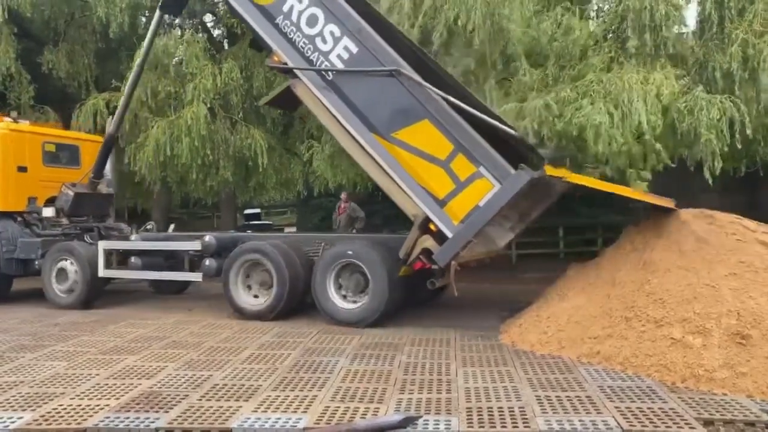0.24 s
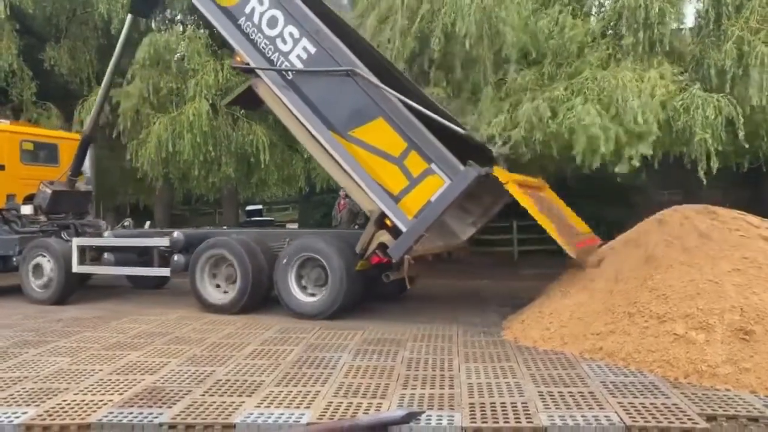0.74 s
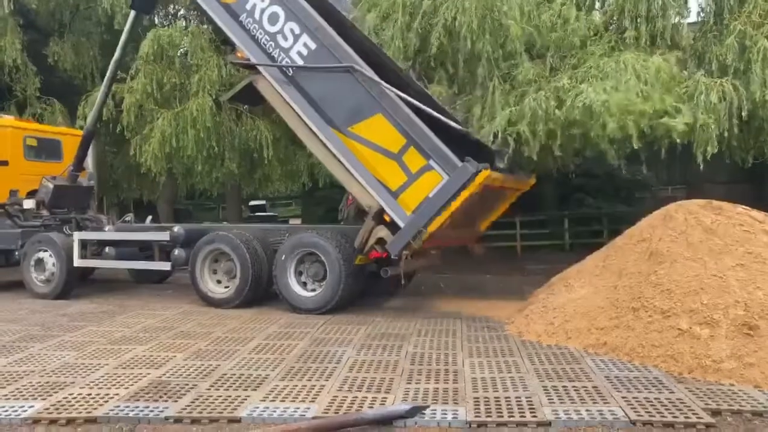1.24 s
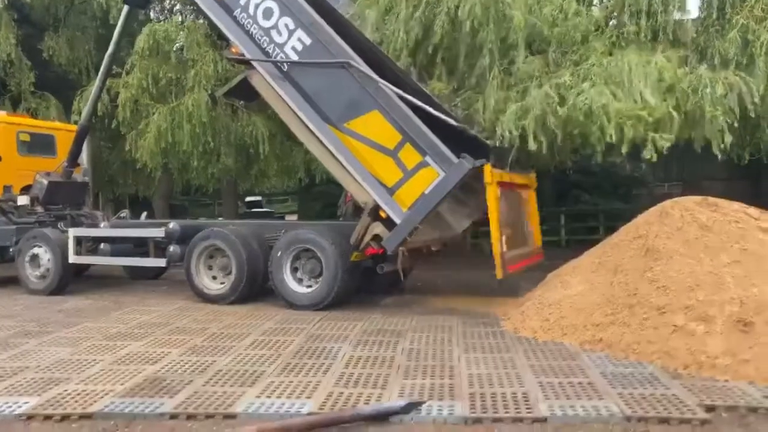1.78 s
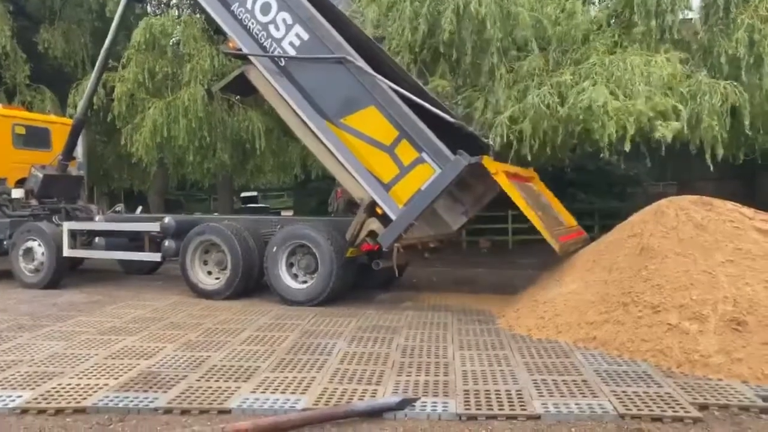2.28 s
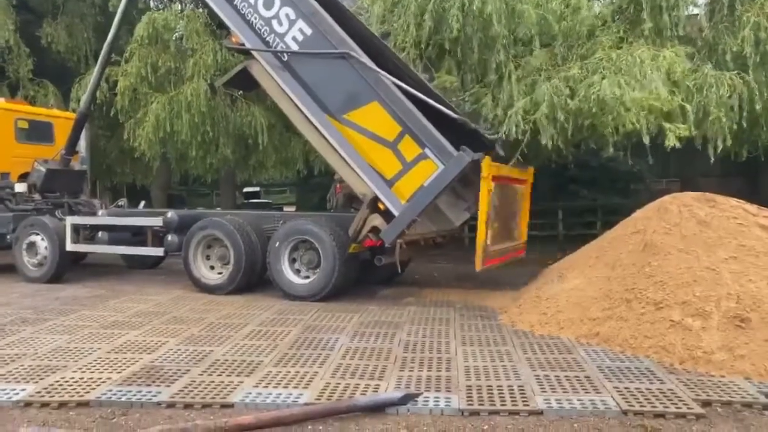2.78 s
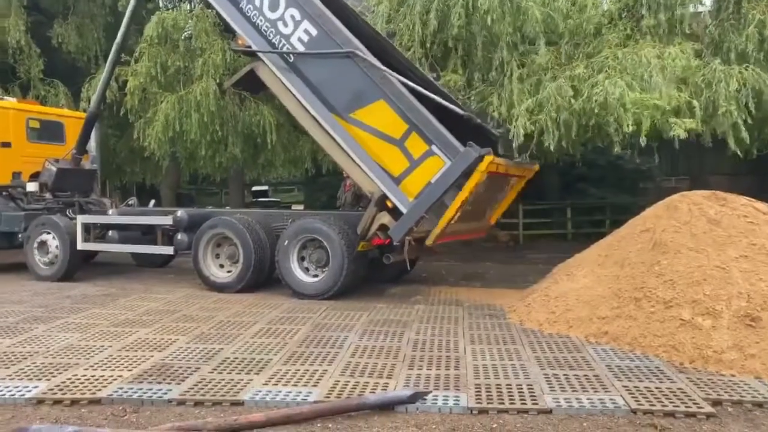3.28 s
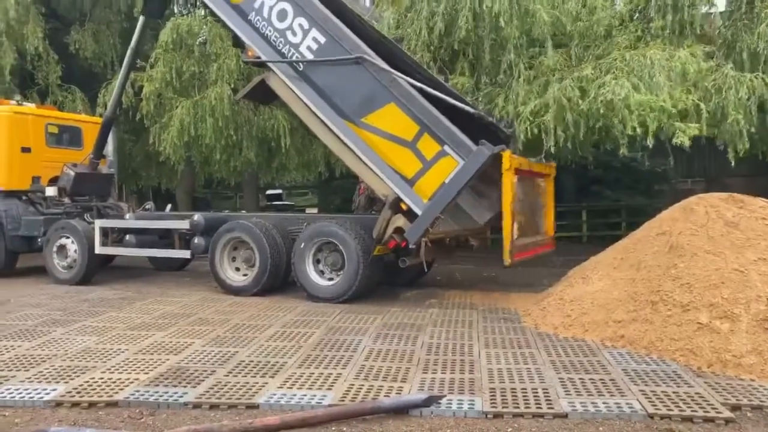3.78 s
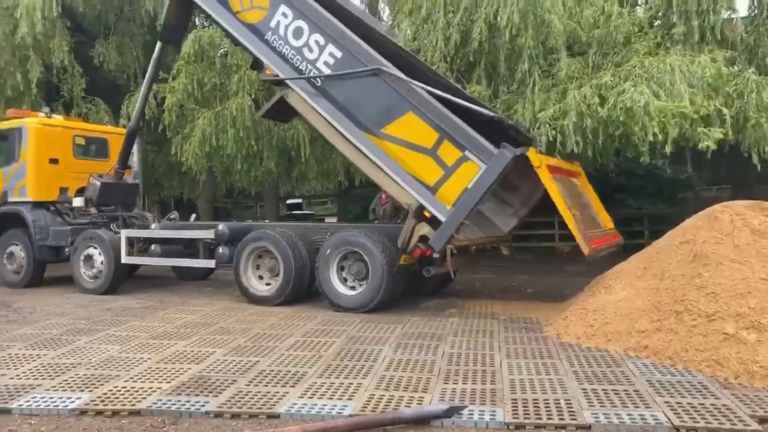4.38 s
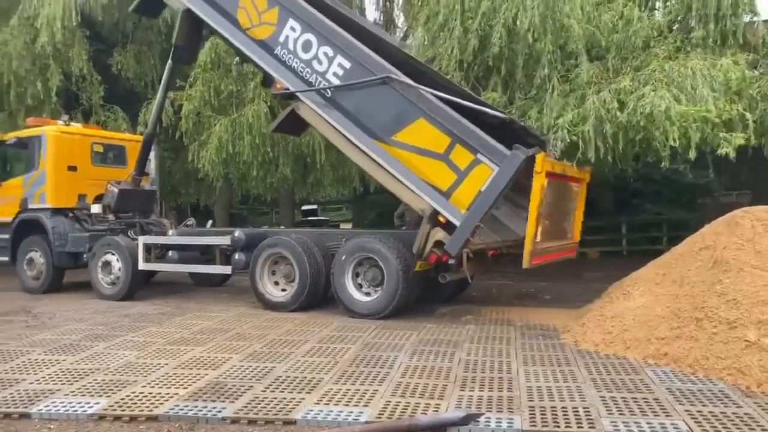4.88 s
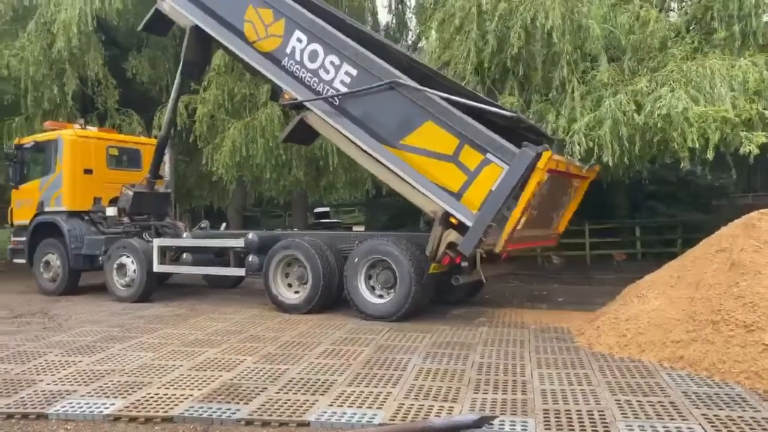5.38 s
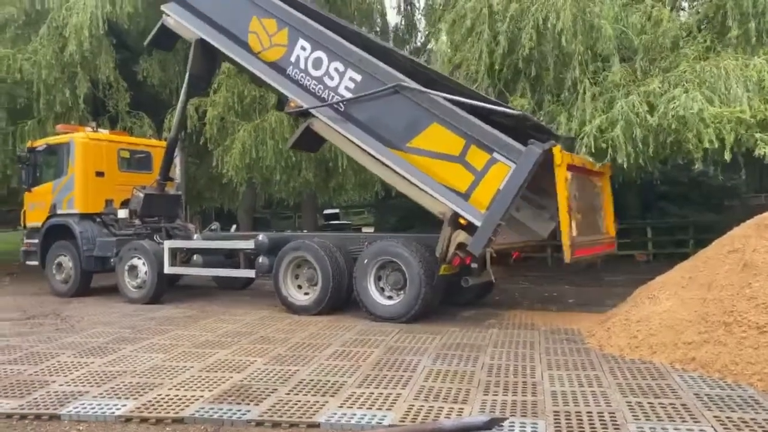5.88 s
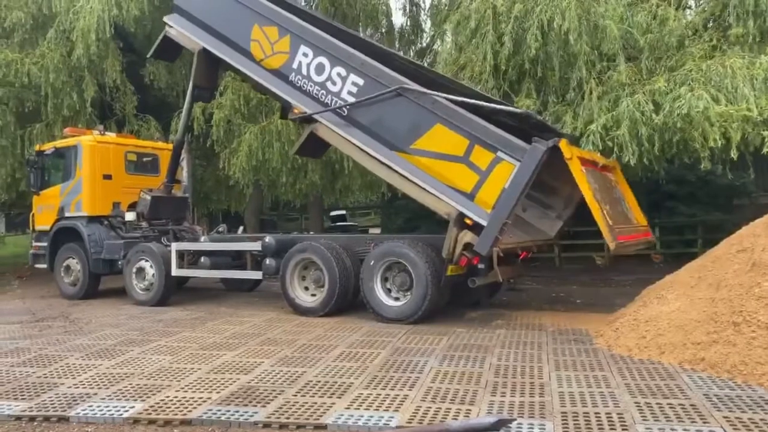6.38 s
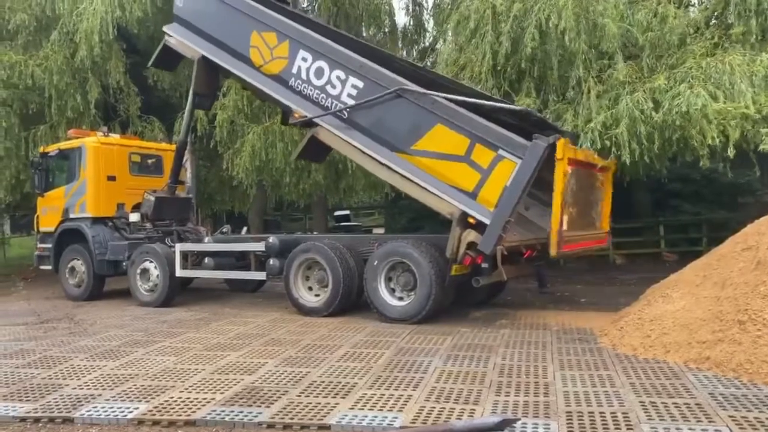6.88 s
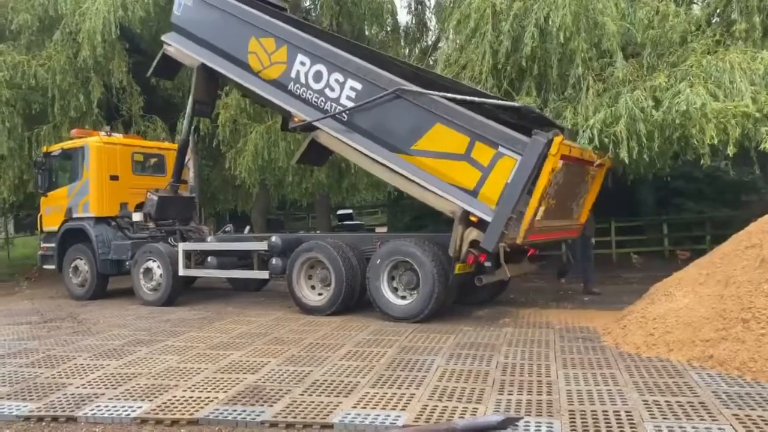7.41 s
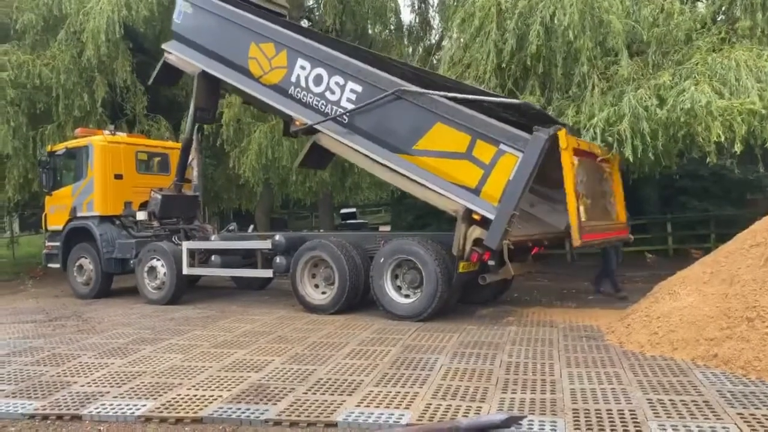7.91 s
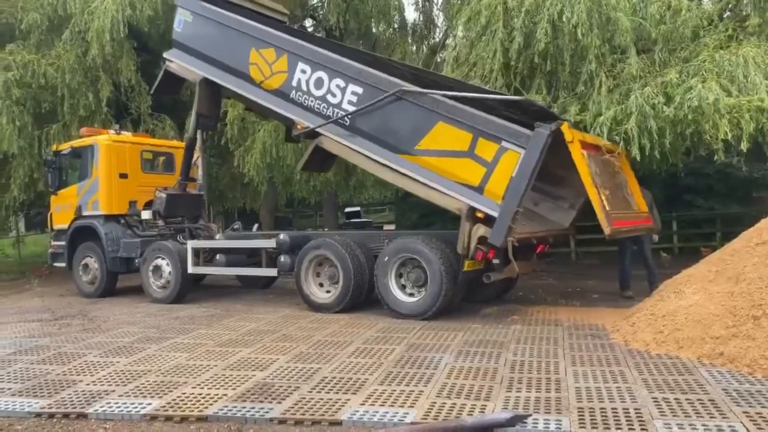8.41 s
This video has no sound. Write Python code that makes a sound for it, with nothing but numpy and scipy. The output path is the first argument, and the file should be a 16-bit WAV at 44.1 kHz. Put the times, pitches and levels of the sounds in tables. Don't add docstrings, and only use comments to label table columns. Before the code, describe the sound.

Heavy truck rumble and rushing sand, one violent metal clang with chatter, air hisses and creaks, then a hollow steel boom over clattering idle.

```python
import sys
import numpy as np
from scipy import signal
from scipy.fft import rfft, irfft, dct, next_fast_len
from scipy.io import wavfile
from scipy.ndimage import uniform_filter1d, map_coordinates

SR = 44100
rng = np.random.default_rng(int(sys.argv[2]) if len(sys.argv) > 2 else 0)


def dump(signal):
    limited = np.clip(np.atleast_2d(signal).T, -1, 1)
    pcm = np.round(limited * 32767).astype(np.int16)
    wavfile.write(sys.argv[1], SR, pcm)


def to_linear_factor(level_db):
    exponent = np.asarray(level_db, float) / 20
    return 10 ** exponent


N = 381465
T = np.arange(N) / SR
FFT_SIZE = next_fast_len(N + SR // 4)
HZ = np.fft.rfftfreq(FFT_SIZE, 1 / SR)

FIRING_HZ = 25.3
SLAM_S, RATTLE_ENDS_S, DROP_S = 1.201, 1.7, 5.603
FINES_RE_FLOW_DB = -12
PLATE_DB, PLATE_DB_PER_DB = -16, 0.61
RIB_DB, RIB_DB_PER_DB = -12.5, 0.94
CHATTER_T60_S = 0.05

# frequency in Hz, density in dB.
CLATTER_HZ_DB = [(240, -16), (400, 0), (578, -10.5), (692, -5), (754, -4), (829, -2), (932, -4), (1120, -5),
                 (1230, -5), (1450, -7.5), (1900, -14.5), (2120, -17), (2600, -35), (3380, -42),
                 (5720, -120)]
SAND_HZ_DB = [(1000, -31), (1700, 2), (1990, -5), (2130, -4), (2460, -1), (2640, -2.5), (3070, -3),
              (3580, -4.5), (4030, -4.5), (4390, -2), (5140, -7.5), (6180, -10.5), (8200, -21),
              (10700, -33), (18000, -120)]
HISS_HZ_DB = [(3240, -25.5), (5500, -4.5), (7090, -5), (7490, -4), (8230, -12.5), (9240, -4), (10200, -1.5),
              (10700, -3), (11400, -10), (14800, -41), (22000, -120)]
PLATE_HZ_DB = [(15, -39), (25, -20), (54, 4), (86, -3.5), (108, -1.5), (130, -6.5), (170, -19), (290, -120)]
PANEL_HZ_DB = [(53, -28), (90, -11.5), (129, 0.5), (172, -2.5), (237, -3.5), (300, -7), (390, -40),
               (660, -120)]
RIBS_HZ_DB = [(160, -34), (270, 0.5), (387, -4.5), (432, -8.5), (470, -7.5), (616, -15.5), (700, -13.5),
              (910, -52), (1540, -120)]
CLANG_HZ_DB = [(180, -36.5), (300, -3), (467, 0.5), (586, -11), (832, -5), (1630, -14), (1840, -9),
               (2490, -8), (3700, -18.5), (4440, -12.5), (4860, -15.5), (6600, -24), (8040, -47.5),
               (9220, -28.5), (11400, -32), (14800, -67), (22000, -120)]
THUD_HZ_DB = [(350, -41), (600, -10.5), (780, -8.5), (848, -2.5), (1050, -19), (1520, -19), (2500, -30),
              (3250, -44), (5500, -120)]

# frequency in Hz, width in Hz, level in dB.
BLOCK_MODES = [(775, 30, 3), (925, 22, 8), (922, 7, 12), (1003, 25, 5), (1950, 40, 4), (3670, 80, 2)]
BODY_MODES = [(60.7, 14, 4), (84, 32, 8), (118, 23, 4.5), (162, 14.5, 6), (200, 19, 4), (239.4, 11.8, 6),
              (280.7, 20, 1), (325, 20, 3), (369, 34, 3), (472, 9.1, 4.5)]
# frequency in Hz, level in dB, T60 in seconds.
BAR_MODES = [(1450, -4.5, 0.34), (1803, -12, 0.44), (2380, -14, .2), (2550, -9, 0.44), (3310, -6.5, .2),
             (4020, -28, 0.14), (4420, -16, 0.43), (4290, -8, .4), (4450, -12, 0.49), (4350, -17, 0.35),
             (6100, -7, 0.09), (6430, -16, 0.23), (7260, -16, 0.15), (7600, -15.5, 0.11)]
# frequency in Hz, width in Hz, share removed.
GROUND_DIPS = [(1500, 92, 0.34), (4030, 170, 0.27), (5000, 330, 0.24), (7100, 280, 0.64)]
# frequency in Hz, left lead in radians, left over right in dB, direct share.
LEFT_PORTS = [(60, 0, 0, .998), (200, .05, 0, .98), (400, .3, 0, .9), (600, 1.55, 2, .6),
              (800, .95, 7, .68), (1100, 2.2, 3, .74), (1500, 2.2, .5, .35), (2000, 2.8, -4, .72),
              (2600, 3.1, -1.5, .88), (3200, 4.4, 0, .1), (3700, 5.8, 0, .5), (4200, 6.3, 0, .85),
              (5000, 9.2, 0, .4), (6500, 12.6, 0, .35), (8500, 15.5, 1, .45), (9500, 19, 0, .42),
              (10800, 18.6, 0, .45)]
AHEAD_PORTS = [(60, 0, 0, .996), (200, 0, 0, .987), (400, .1, 0, .95), (600, 0, 0, .85), (800, 0, 0, .95),
               (2000, 0, -1, .92), (2600, .5, -5, .72), (3700, 1.5, -2, .2), (4300, .5, -5, .55),
               (5000, 3.3, -1.5, .34), (6500, 6.1, 0, .75), (8500, 9.3, -1.5, .7), (9500, 12.6, 0, .72)]

# time in seconds, depth 0 to 1.
KNOCK_DEPTH = [
    (0, .12),
    (3.3, .18),
    (4.3, .37),
    (8.65, .4),
]
# time in seconds, clatter level in dB.
ENGINE_S_DB = [(0, -36.5), (.13, -35), (.8, -37.5), (1.16, -40), (1.95, -47), (2.5, -49), (3.44, -49.5),
               (3.69, -56.5), (4.4, -54), (5.5, -55), (5.9, -50.5), (6.3, -52.5), (6.5, -50.5), (8.45, -49),
               (8.65, -47.5)]
# time in seconds, flow level in dB.
FLOW_S_DB = [(0, -41.5), (.13, -38.5), (.5, -42.5), (1.16, -45), (1.95, -57.5), (2.5, -57), (2.68, -49),
             (3.44, -55.5), (3.76, -60.5), (3.82, -56), (4.36, -60), (4.55, -60), (5.3, -61.5),
             (6.25, -60.5), (6.8, -57.5), (7.15, -56.5), (8.65, -53.5)]
# start in seconds, end in seconds, level in dB.
AIR_LEAKS = [
    (2.491, 3.694, -65),
    (3.497, 4.54, -57),
    (4.39, 5.797, -71),
    (5.83, 6.057, -64),
]
# start in seconds, level in dB, rise in seconds, T60 in seconds.
COARSE_SLIDES = [
    (2.58, -54, 0.11, 1.1),
    (2.9, -46, .03, 0.53),
    (3.83, -48, .01, .35),
]
FINE_SLIDES = [
    (2.68, -54, .02, 0.65),
    (3.08, -48.5, .03, 0.87),
    (7.3, -62, .2, 3.3),
    (8.0, -60, .2, 3),
]
# start
# in seconds, level in dB, rise in seconds, T60 in seconds, centre in Hz, width in Hz.
PUFFS = [(.512, -39, .004, 0.2, 9100, 5000), (.515, -32, .004, 0.16, 4600, 2500),
         (3.83, -47, .006, 0.32, 3800, 3500), (3.83, -48, .006, 0.14, 3700, 600),
         (3.605, -50, .006, 0.16, 3700, 500), (5.09, -53, .047, .9, 6230, 2500),
         (5.853, -45, .025, 0.37, 4400, 2000), (5.86, -45.5, .024, .45, 9200, 2500),
         (5.86, -50, .02, .3, 7000, 1500), (6.35, -54, .01, 0.13, 9000, 5000),
         (6.882, -42, 0.011, 0.22, 10000, 3000), (6.882, -37.5, .012, 0.18, 4260, 2400),
         (6.885, -46, .012, .16, 6900, 1500), (1.53, -31.5, .01, 0.33, 4300, 1000),
         (7.101, -47, .001, 0.043, 3500, 1500), (7.325, -34.5, .001, .05, 1000, 700),
         (1.176, -31.5, 0.018, .3, 4500, 6000)]
# start in seconds, end in seconds, first pitch in Hz, last in Hz, level in dB.
SQUEAKS = [
    (3.74, 3.8, 5640, 5620, -53),
    (3.8, 3.87, 5640, 5560, -64),
    (4.28, 4.4, 3060, 3070, -65),
    (4.47, 4.62, 3040, 3050, -66),
]
# start in seconds, end in seconds, first pitch in Hz, last in Hz, level in dB.
FAR_SQUEAKS = [
    (7.87, 8.11, 1235, 1400, -45),
    (7.88, 7.95, 1200, 1170, -51),
]
# start in seconds, end in seconds, first slips per second, last, level in dB.
CREAKS = [
    (5.091, 5.145, 105, 115, -39),
    (5.145, 5.32, 125, 55, -40),
    (6.466, 6.48, 30, 30, -43),
    (6.533, 6.67, 55, 40, -41),
]
# time in seconds, side panel level in dB.
SHAKE_S_DB = [(0, -23.5), (.19, -26.5), (.55, -24), (.86, -29), (1.17, -27), (1.34, -25.5), (1.46, -27.5),
              (1.72, -22), (1.93, -22), (2.06, -25), (2.26, -28.5), (2.32, -32), (2.9, -39.5), (3.3, -43),
              (3.7, -49.5), (4.6, -52), (8.0, -54), (8.65, -45.5)]
# time in seconds, level in dB.
LURCHES = [(.15, -19.5), (.27, -19), (.52, -20), (.83, -24), (.97, -16.5), (1.27, -42), (1.66, -30),
           (2.19, -33), (3.2, -56), (6.33, -44), (8.5, -40)]
# time in seconds, level in dB.
SURGES = [
    (.02, -23),
    (.2, -27.5),
    (.83, -32),
    (1.31, -27.5),
    (1.62, -19),
    (2.0, -38.5),
    (6.73, -50),
]
# boom in dB, its T60 in seconds, after-ring in dB, its T60 in seconds.
DROP_BOOMS = [
    (-30, 1.25, -39.5, 15),
    (-23, 0.9, -41, 11.8),
    (-24.5, 0.92, -49, 15.3),
]
# start in seconds, end in seconds, first pitch in Hz, last in Hz, level in dB.
PANEL_HUMS = [(5.95, 7.2, 87, 84, -35), (5.72, 6.6, 150, 152, -34), (5.72, 6.05, 68, 66, -30),
              (5.56, 5.8, 860, 860, -46), (5.65, 6.1, 385, 390, -45), (5.68, 5.95, 440, 480, -53),
              (5.7, 6.3, 325, 322, -46), (5.595, 5.78, 85, 100, -27), (5.595, 5.74, 158, 155, -29),
              (5.74, 6.15, 135, 130, -33), (5.595, 5.74, 355, 365, -34), (5.6, 5.85, 285, 282, -37),
              (5.85, 6.35, 288, 280, -46), (6.1, 6.35, 255, 248, -45), (6.68, 6.95, 370, 378, -51),
              (5.7, 6.0, 225, 232, -42), (1.52, 2.03, 128, 138, -26), (1.76, 2.04, 238, 235, -30),
              (2.05, 2.35, 110, 150, -33), (3.12, 3.32, 58, 68, -38), (3.4, 3.6, 60, 64, -41),
              (3.68, 3.88, 60, 56, -42)]
# time in seconds, peak in dB, pitch in Hz.
CHATTER_HITS = [(1.2065, -18, 5840), (1.2065, -15, 2396), (1.2304, -7, 4490), (1.232, -21, 5800),
                (1.258, -13.5, 2495), (1.247, -22, 4560), (1.265, -23, 4520), (1.278, -20.5, 4500),
                (1.291, -23, 4300), (1.2996, -17.5, 4220), (1.3086, -19, 4400), (1.319, -22.5, 4400),
                (1.327, -23, 4520), (1.224, -16, 2400), (1.345, -27, 3020), (1.372, -28.5, 2600),
                (1.355, -22, 4360), (1.385, -32, 4330), (1.4757, -33, 4090), (1.5106, -31, 4210),
                (1.538, -30, 4320), (1.566, -31, 4210), (6.892, -47, 4290), (6.9, -38, 4290),
                (6.915, -53, 4500), (.5203, -29.5, 8900)]
# time in seconds, peak in dB.
CONTACTS = [
    (1.205, -17.5),
    (1.228, -20),
    (1.257, -24.5),
    (1.301, -38),
    (1.538, -39),
]
# time in seconds, level in dB.
CRACKS = [
    (1.206, -4.5),
    (1.226, -14.5),
    (1.257, -25),
]
# time in seconds, frequency in Hz, peak in dB, T60 in seconds.
AIR_PUSHES = [
    (1.2068, 90, .3, .065),
    (1.205, 68, -14, .2),
    (5.615, 95, -20, .15),
]
# crash in dB, its T60 in seconds, rattle in dB, later loss in dB per second.
SLAM_TAILS = [
    (-16.5, 0.45, -30.5, 86.5),
    (-16, 0.42, -43.5, 62),
]
# frequency in Hz, step against surrounding loudness in dB.
GRAIN_HZ_DB = [(100, -30), (500, -26), (1000, -16), (1500, -12.5), (2000, -11), (2400, -8.5), (3000, -8.5),
               (3500, -11), (4050, -9), (4500, -11), (5050, -7.5), (5600, -9.5), (7100, -6), (8200, -3.5),
               (9500, -8), (10800, -7), (11500, 3)]


def unit(x):
    return x / np.sqrt(np.mean(np.mean(np.atleast_2d(x), axis=0) ** 2) + 1e-20)


def along(points):
    f, *cols = np.transpose(points)
    return [np.interp(np.log(HZ + 1), np.log(f + 1), c) for c in cols]


def curve(rows):
    s, values = np.transpose(rows)
    return np.interp(T, s, values)


def wobble(rate_hz):
    knots = rng.standard_normal(int(N * rate_hz / SR) + 4)
    return map_coordinates(knots, [T * rate_hz])


def colour(points):
    return to_linear_factor(along(points)[0])


def peak(hz, width_hz):
    return 1j * HZ * width_hz / (hz * hz - HZ * HZ + 1j * HZ * width_hz)


def resonant(modes):
    return 1 + np.sqrt(sum(abs(to_linear_factor(db) * peak(hz, width)) ** 2 for hz, width, db in modes))


def grounded():
    dips = [1 - np.clip(share, 0, .9) * abs(peak(hz, width)) ** 2 for hz, width, share in GROUND_DIPS]
    return np.prod(dips, axis=0)


def fade(s, rise_s, t60_s):
    start = int(np.ceil(s * SR))
    u = T[start:start + int(2 * t60_s * SR)] - s
    envelope = (1 - np.exp(-u / rise_s)) * to_linear_factor(-60 * u / t60_s)
    return np.pad(envelope, (start, N - start - len(u)))


def rush(gain, place, patchy_db):
    z = signal.stft(rng.standard_normal((3, N)), nperseg=512)[2]
    field = uniform_filter1d(rng.standard_normal(z.shape[1:]), size=5, axis=0)
    field = uniform_filter1d(field, size=10, axis=1)
    patchy = signal.istft(z * to_linear_factor(patchy_db * field / field.std()), nperseg=512)[1]
    noise = rfft(patchy[:, :N], FFT_SIZE)
    lead_rad, shade_db, share = along(place)
    share = np.clip(share, 0, 1)
    left = to_linear_factor(shade_db / 2) * np.exp(.5j * lead_rad)
    right = to_linear_factor(-shade_db / 2) * np.exp(-.5j * lead_rad)
    port = np.array([left, right])
    direct_power = share * abs(port.sum(axis=0)) ** 2
    scattered_power = (1 - share) * (abs(port) ** 2).sum(axis=0)
    pair = port * (np.sqrt(share) * noise[0] + np.sqrt(1 - share) * noise[1:])
    shaped = pair * gain / np.sqrt(direct_power + scattered_power)
    return unit(irfft(shaped, FFT_SIZE)[:, :N])


def tones(rows, edge_s, shaky, swell_db):
    out = np.zeros(N)
    for a, b, hz, end_hz, db in rows:
        level = to_linear_factor(db + 3.0 + swell_db * wobble(23))
        window = np.interp(T, [a, a + edge_s, b - edge_s, b], [0, 1, .6, 0])
        pitch_hz = np.interp(T, [a, b], [hz, end_hz]) * (1 + shaky * wobble(40))
        out += level * window * np.sin(2 * np.pi * np.cumsum(pitch_hz) / SR)
    return out


def air_and_fines(sand_db):
    leaks = sum(to_linear_factor(db) * np.interp(T, [a, a + 0.13 * (b - a), b - 0.19 * (b - a), b], [0, 1, 1, 0])
                for a, b, db in AIR_LEAKS)
    return to_linear_factor(sand_db + FINES_RE_FLOW_DB + 2.8 * wobble(7)) + leaks


def engine_and_sand():
    sand_db = curve(FLOW_S_DB)
    turn = np.cumsum(FIRING_HZ * (1 + 0.015 * wobble(1.49))) / SR
    cylinder_db = np.array([0.41, -0.92, 0.042, -0.1, 0.96])[turn.astype(int) % 5]
    burst = to_linear_factor(cylinder_db + 0.63 * wobble(25)) * np.exp(np.cos(2 * np.pi * turn))
    depth = np.clip(curve(KNOCK_DEPTH), 0, 1)
    gate = 1 - depth + depth * burst / burst.mean()
    path = resonant(BLOCK_MODES) * grounded()
    knocking = gate * rush(colour(CLATTER_HZ_DB) * path, LEFT_PORTS, patchy_db=1.5)
    clatter = to_linear_factor(curve(ENGINE_S_DB) + 3.5) * unit(knocking)
    grit = to_linear_factor(1.2 * wobble(250))
    grains = gate ** 0.35 * grit * rush(colour(SAND_HZ_DB) * path, LEFT_PORTS, patchy_db=1.7)
    sand = to_linear_factor(sand_db + 4.5 + 0.58 * wobble(9) + 1.04 * wobble(30)) * unit(grains)
    hiss = to_linear_factor(1.5) * air_and_fines(sand_db) * rush(colour(HISS_HZ_DB), LEFT_PORTS, patchy_db=.7)
    return clatter + sand + hiss


def slides():
    out = np.zeros((2, N))
    for rows, hz, width_hz in [(COARSE_SLIDES, 2600, 700), (FINE_SLIDES, 4100, 1600)]:
        level = sum(to_linear_factor(db) * fade(s, rise, t60) for s, db, rise, t60 in rows)
        out += level * rush(peak(hz, width_hz) ** 2, LEFT_PORTS, patchy_db=1.0)
    return out


def hinge_slips():
    uneven = 1 + .12 * wobble(60)
    slips = np.zeros(N)
    for a, b, first_hz, last_hz, db in CREAKS:
        count = np.cumsum(np.interp(T, [a, b], [first_hz, last_hz], 0, 0) * uneven) / SR
        slips += to_linear_factor(db + 13) * np.diff(np.ceil(count), prepend=0)
    return slips * to_linear_factor(2.2 * rng.standard_normal(N))


def valves_and_hinge():
    puffs = sum(to_linear_factor(db) * fade(s, rise, t60) * rush(peak(hz, width) ** 2, LEFT_PORTS, patchy_db=2.0)
                for s, db, rise, t60, hz, width in PUFFS)
    hinge_gain = peak(6300, 3000) ** 4 + .5 * peak(6800, 270)
    ticks = irfft(rfft(hinge_slips(), FFT_SIZE) * hinge_gain, FFT_SIZE)[:N]
    squeaks = tones(SQUEAKS, .02, .005, 3.5)
    far = tones(FAR_SQUEAKS, .02, .004, 3.1) * [[1], [-.85]]
    return puffs + ticks * to_linear_factor([[-1.5], [1.5]]) + squeaks + far


def chatter():
    out = np.zeros((2, N))
    chance = rng.standard_normal((len(CHATTER_HITS), 3))
    for (s, db, hz), (beat, left, right) in zip(CHATTER_HITS, chance):
        near = slice(int(s * SR), int(s * SR) + SR // 8)
        turn = 2 * np.pi * hz * (T[near] - s) + 0.44 * np.array([[left], [right]])
        ring = np.sin(turn) + .5 * np.sin(turn * (1.03 + 0.0091 * beat))
        out[:, near] += to_linear_factor(db) * to_linear_factor([[-2], [2]]) * fade(s, 0.0015, CHATTER_T60_S)[near] * ring
    return out


def shaking():
    shake_db = curve(SHAKE_S_DB)
    lurch = sum(to_linear_factor(db) * fade(s, 0.031, 0.55) for s, db in LURCHES)
    surge = sum(to_linear_factor(db - 1.0) * fade(s, 0.06, 0.69) for s, db in SURGES)
    plate = to_linear_factor(PLATE_DB + PLATE_DB_PER_DB * shake_db) + lurch
    ribs = to_linear_factor(RIB_DB + RIB_DB_PER_DB * shake_db) + surge
    boom = [to_linear_factor(db) * fade(DROP_S, rise, t60) + to_linear_factor(ring_db) * fade(DROP_S, rise, long_t60)
            for (db, t60, ring_db, long_t60), rise in zip(DROP_BOOMS, [.03, .008, .015])]
    return [a + b for a, b in zip([plate, to_linear_factor(shake_db), ribs], boom)]


def body():
    plate, panel, ribs = shaking()
    modes = resonant(BODY_MODES)
    plate = plate * to_linear_factor(1.0 * wobble(9.9)) * rush(colour(PLATE_HZ_DB) * modes, AHEAD_PORTS, patchy_db=-0.3)
    panel = panel * to_linear_factor(0.45 * wobble(14)) * rush(colour(PANEL_HZ_DB) * modes, AHEAD_PORTS, patchy_db=-0.56)
    ribs = ribs * to_linear_factor(0.49 * wobble(14)) * rush(colour(RIBS_HZ_DB) * modes, AHEAD_PORTS, patchy_db=1.36)
    thud = to_linear_factor(-32.5) * fade(DROP_S, 0.0079, 0.53) * rush(colour(THUD_HZ_DB), AHEAD_PORTS, patchy_db=2.5)
    return plate + panel + ribs + thud + tones(PANEL_HUMS, .05, .012, 2.2)


def slam_tail(rise_s, db, t60_s, rattle_db, sink_db_per_s):
    sunk_db = sink_db_per_s * np.clip(T - RATTLE_ENDS_S, 0, None)
    rattle = to_linear_factor(rattle_db - sunk_db) * fade(SLAM_S, rise_s, 32)
    return to_linear_factor(db) * fade(SLAM_S, rise_s, t60_s) + rattle


def bar_ring():
    out = np.zeros((2, N))
    near = slice(int(SLAM_S * SR), int(SLAM_S * SR) + SR)
    for s, db in CONTACTS:
        chance = rng.standard_normal((len(BAR_MODES), 3))
        for (hz, level_db, t60), (size, left, right) in zip(BAR_MODES, chance):
            phase = 0.98 * np.array([[left], [right]])
            ring = np.sin(2 * np.pi * hz * (1 + .006 * size) * (T[near] - s) + phase)
            envelope = fade(s, 0.00051, min(t60, .3))[near]
            out[:, near] += to_linear_factor(db + level_db + 3.7 * size) * envelope * ring
    return out


def slam():
    clang = colour(CLANG_HZ_DB)
    high = 1 / (1 + (3000 / (HZ + 1)) ** 8)
    low_part = slam_tail(0.0029, *SLAM_TAILS[0]) * rush(clang * (1 - high), AHEAD_PORTS, patchy_db=0.0)
    high_part = slam_tail(0.0075, *SLAM_TAILS[1]) * rush(clang * high, AHEAD_PORTS, patchy_db=3.0)
    crack_level = sum(to_linear_factor(db) * fade(s, 0.00093, 0.019) for s, db in CRACKS)
    cracks = crack_level * rush(clang * (HZ / 3000), AHEAD_PORTS, patchy_db=-2.5)
    push = sum(to_linear_factor(db) * fade(s, 0.0037, t60) * -np.sin(2 * np.pi * hz * (T - s))
               for s, hz, db, t60 in AIR_PUSHES)
    return low_part + high_part + bar_ring() + cracks + push


def scene():
    return engine_and_sand() + slides() + valves_and_hinge() + chatter() + body() + slam()


def masked(x):
    hop, start = 1024, 930
    pair = np.pad([x[0] + x[1], x[0] - x[1]], ((0, 0), (2 * hop - start, 2 * hop)))
    count = pair.shape[1] // hop - 1
    k = np.arange(hop) + .5
    window = signal.windows.kaiser_bessel_derived(2 * hop, 4 * np.pi)
    index = np.arange(count)[:, None] * hop + np.arange(2 * hop)
    a, b, c, d = np.split(pair[:, index] * window, 4, axis=2)
    z = dct(np.dstack([-c[..., ::-1] - d, a - b[..., ::-1]]), type=4, norm="ortho")
    around = np.sqrt(abs(uniform_filter1d((z ** 2).sum(axis=0), size=49, axis=1)))
    uneven = uniform_filter1d(rng.standard_normal((2, count, hop // 16)), size=3, axis=1)
    shortage = np.tanh(2 * uniform_filter1d(rng.standard_normal((count, 1)), size=2, axis=0))
    hz, db = np.transpose(GRAIN_HZ_DB)
    step_db = np.interp(np.log(k * SR / 2 / hop), np.log(hz), db) + 4.5 * shortage
    step = 1e-9 + around * to_linear_factor(step_db)
    band = np.sqrt(np.repeat((z ** 2).reshape(2, count, -1, 8).mean(axis=3), 8, axis=2))
    z = z * (band > step * to_linear_factor(7.2 * np.repeat(uneven, 16, axis=2) - 1 - 2 * shortage))
    rounded = np.sign(z) * np.floor(abs(z) / step + .4) * step
    u, v = np.split(dct(rounded, type=4, norm="ortho"), 2, axis=2)
    y = np.dstack([v, -v[..., ::-1], -u[..., ::-1], -u]) * window
    first = np.pad(y[..., :hop], ((0, 0), (0, 1), (0, 0)))
    second = np.pad(y[..., hop:], ((0, 0), (1, 0), (0, 0)))
    mid, side = (first + second).reshape(2, -1)[:, 2 * hop - start:][:, :N]
    return np.array([mid + side, mid - side]) / 2


def band_limit(x):
    return signal.sosfilt(signal.butter(12, 11700, fs=SR, output="sos"), x)


def record(dry):
    limited = dry / (1 + abs(dry / 1.05) ** 6) ** (1 / 6)
    mix = masked(limited)
    return band_limit(mix)


dry = scene()
out = record(dry)
dump(out)
```